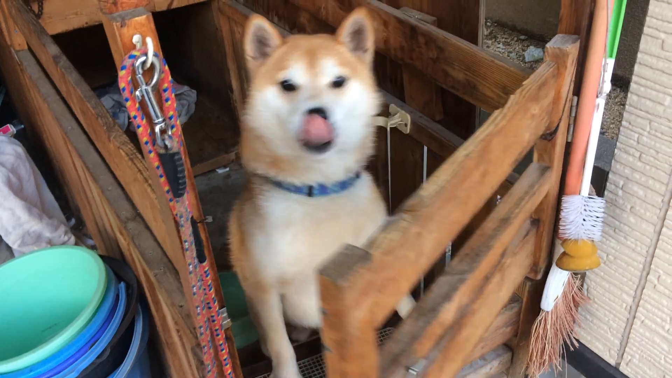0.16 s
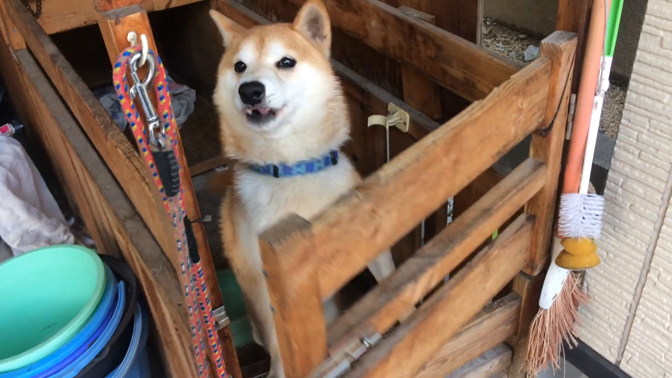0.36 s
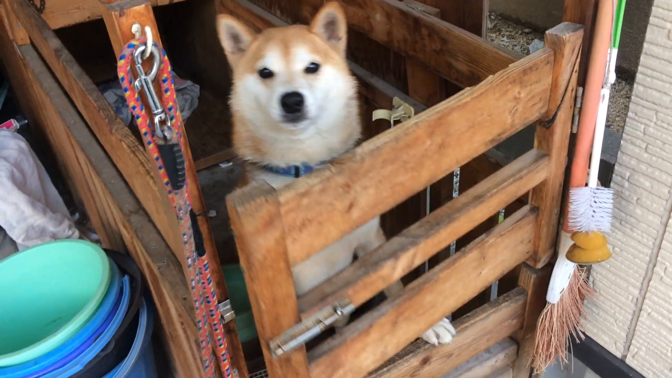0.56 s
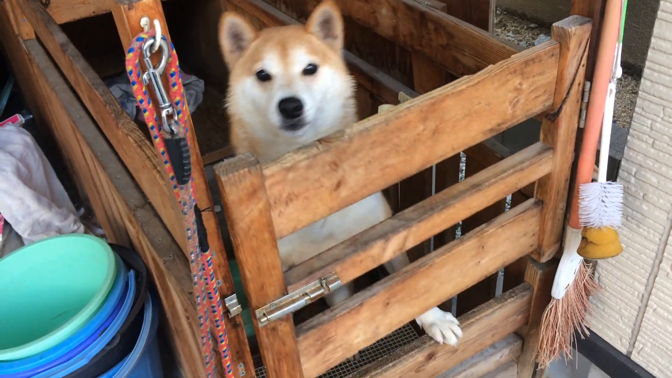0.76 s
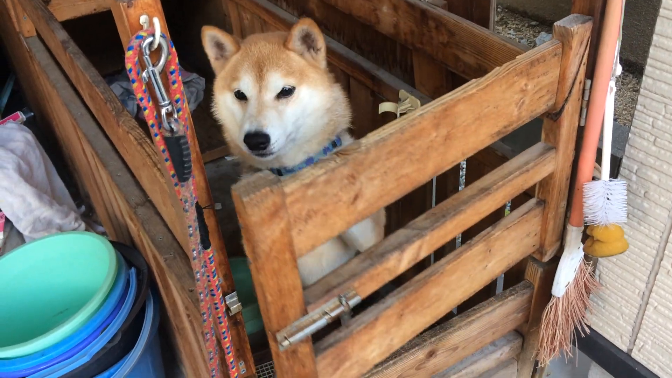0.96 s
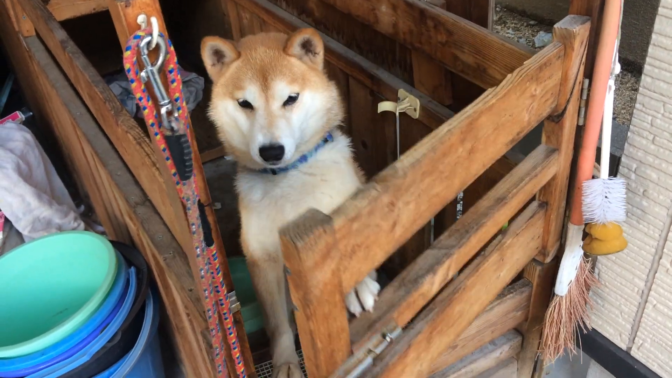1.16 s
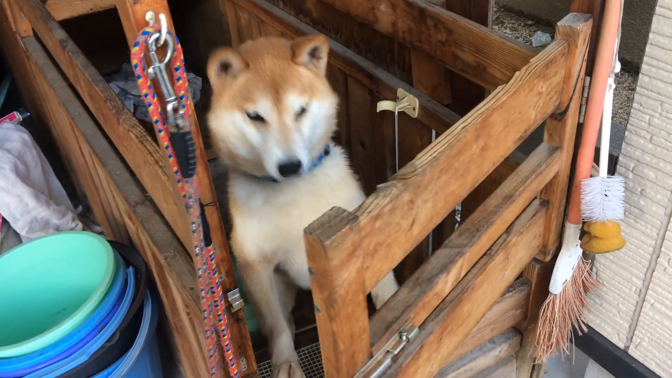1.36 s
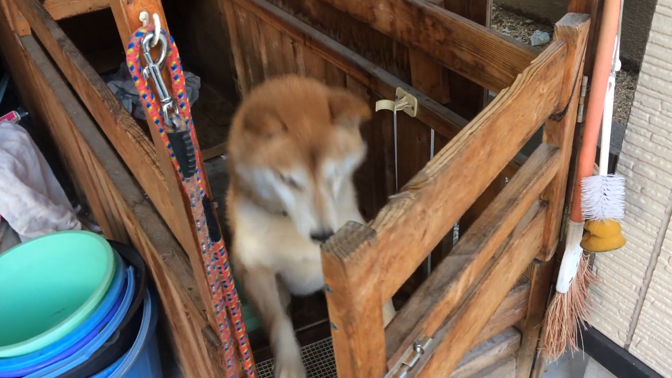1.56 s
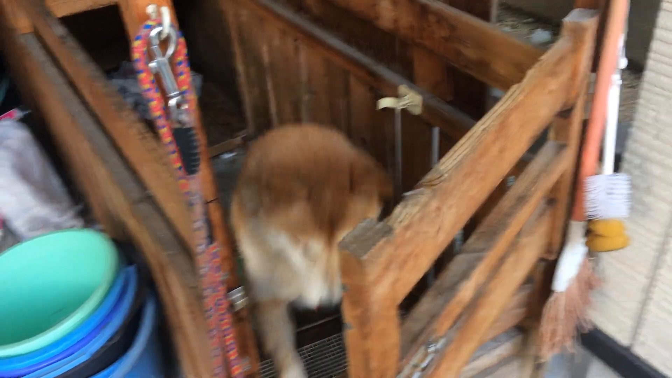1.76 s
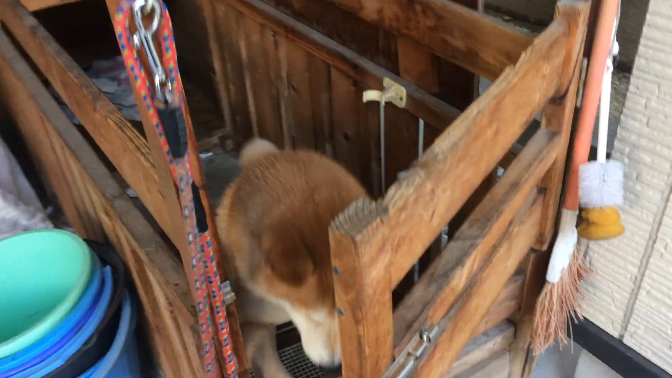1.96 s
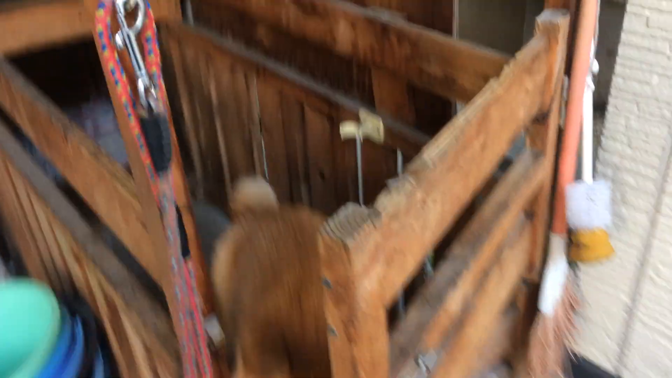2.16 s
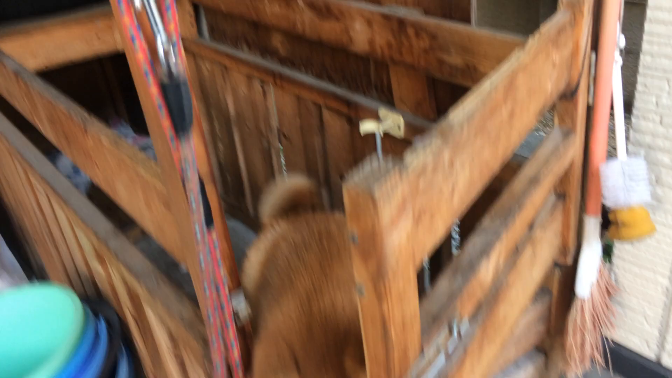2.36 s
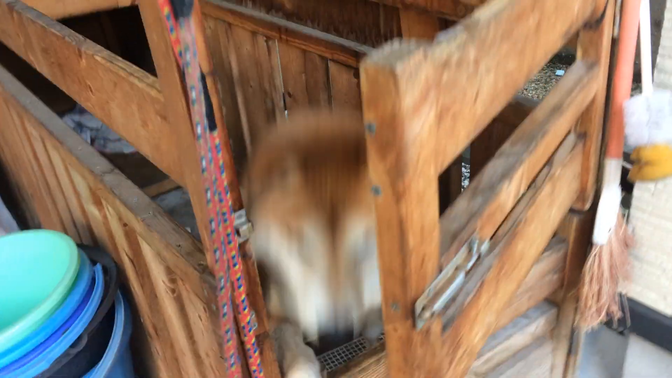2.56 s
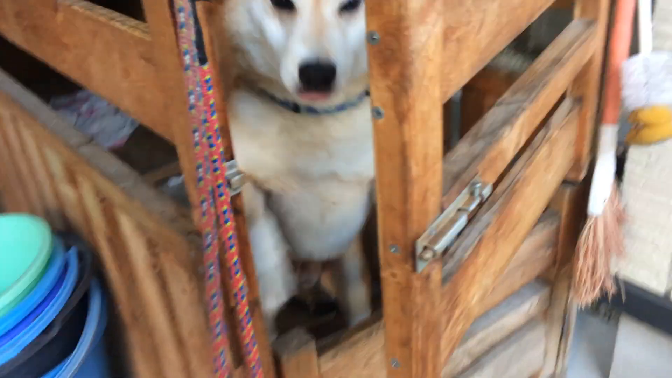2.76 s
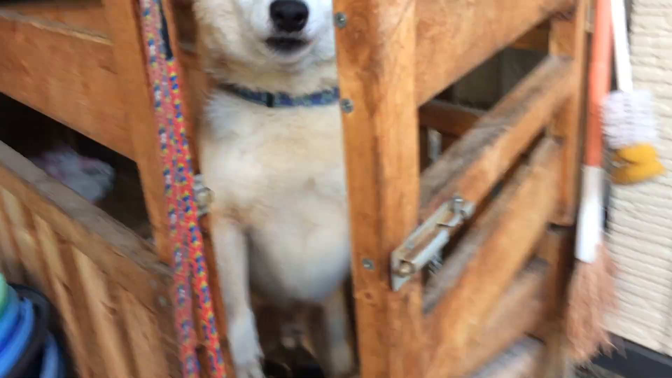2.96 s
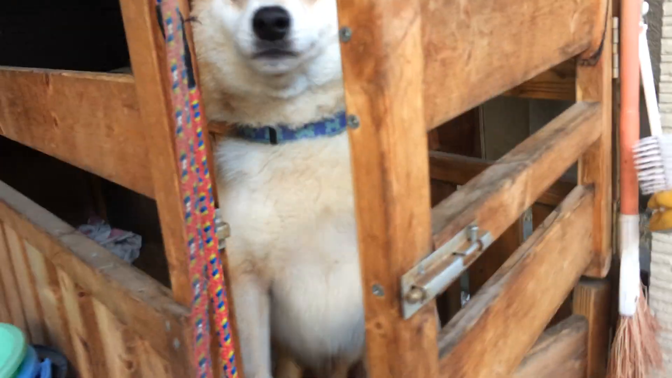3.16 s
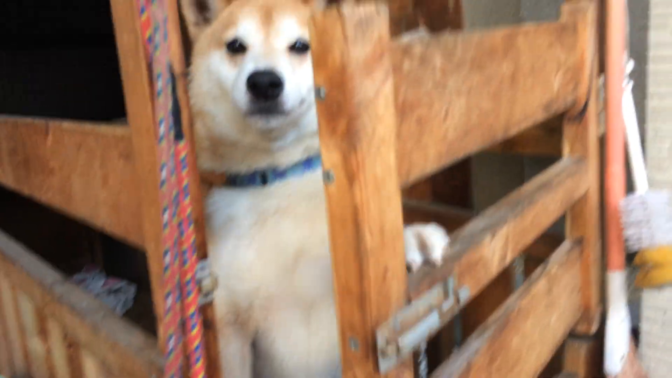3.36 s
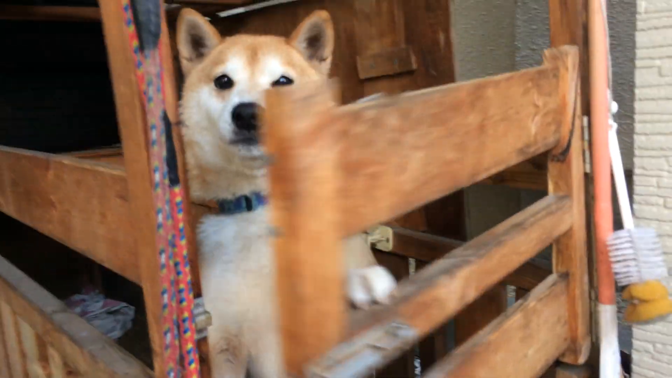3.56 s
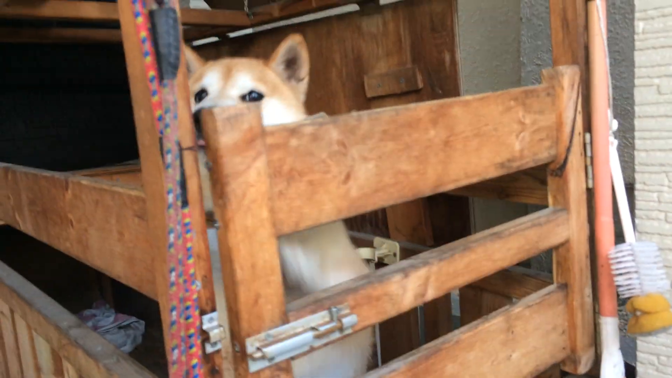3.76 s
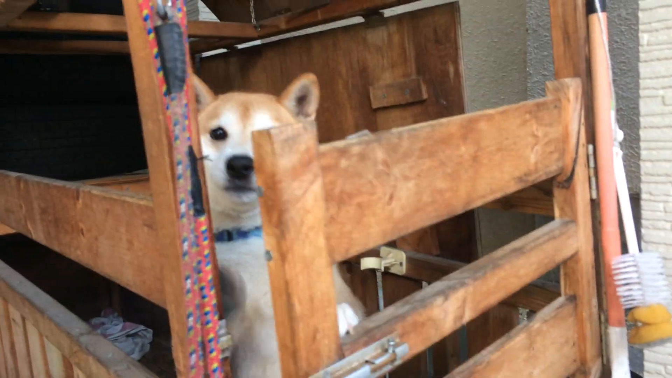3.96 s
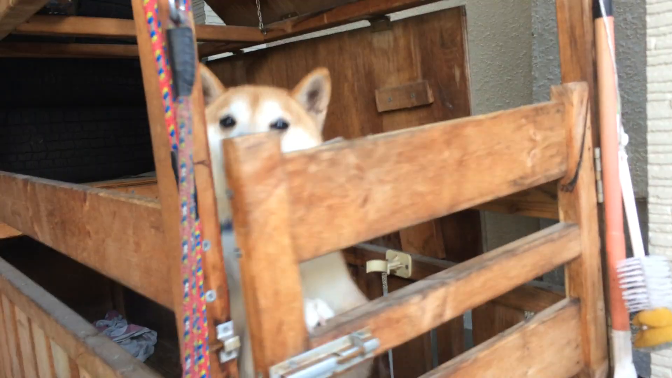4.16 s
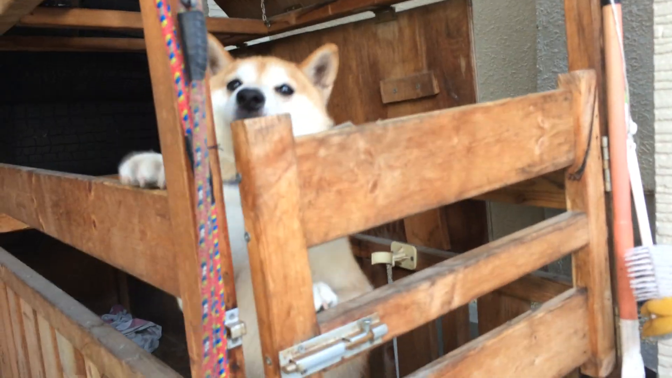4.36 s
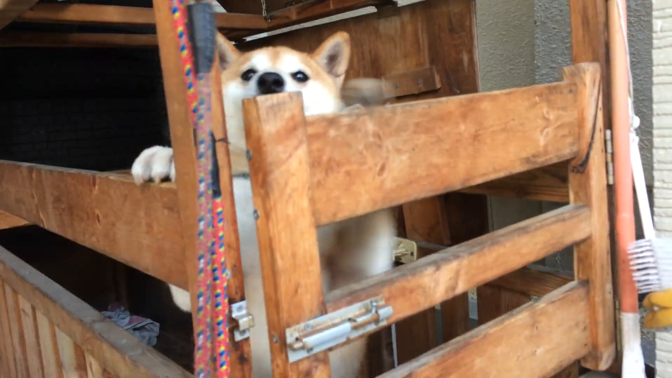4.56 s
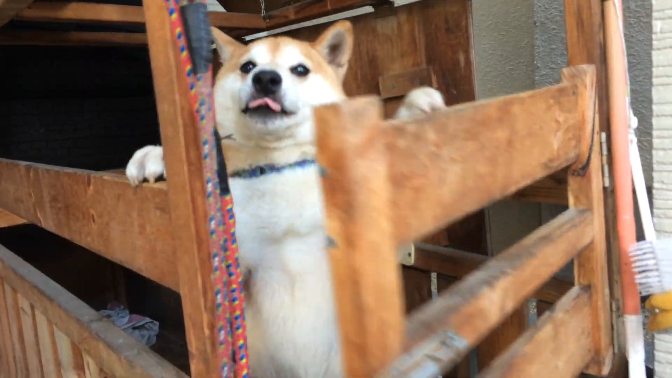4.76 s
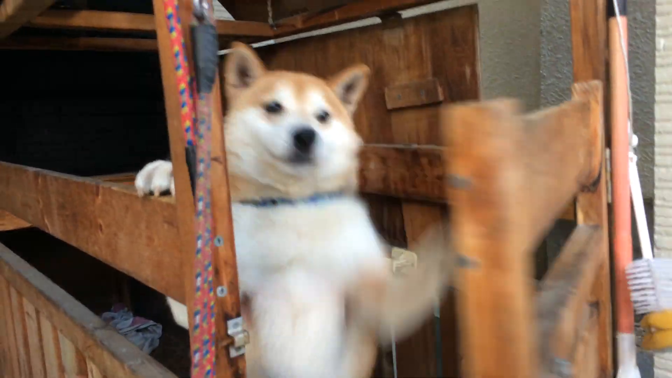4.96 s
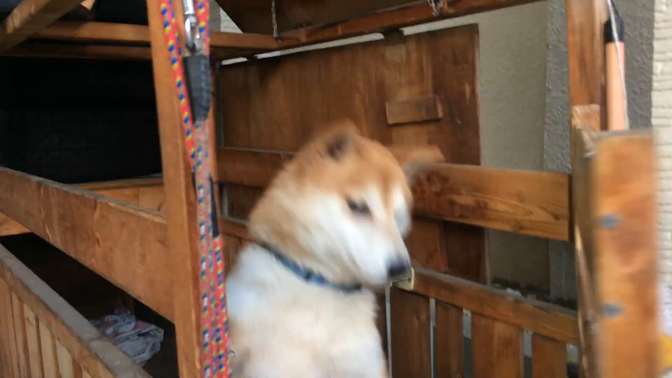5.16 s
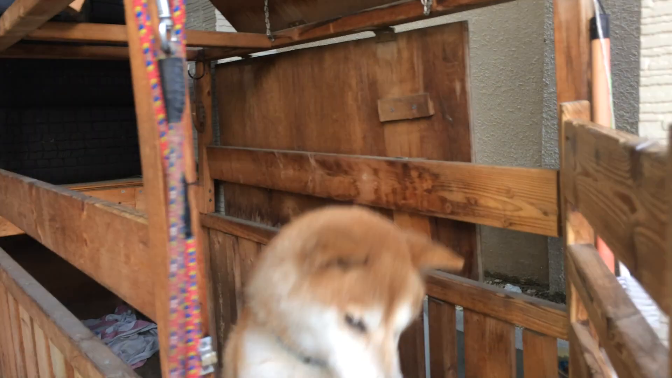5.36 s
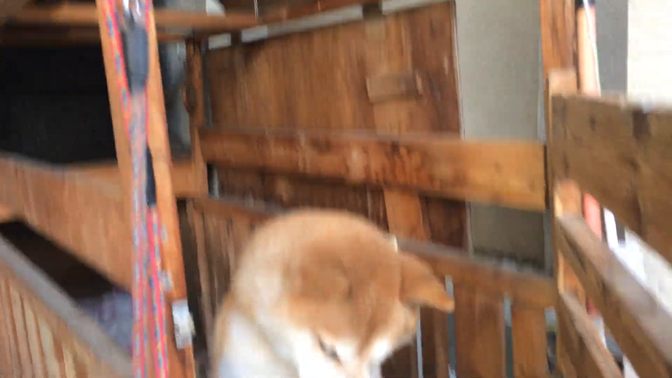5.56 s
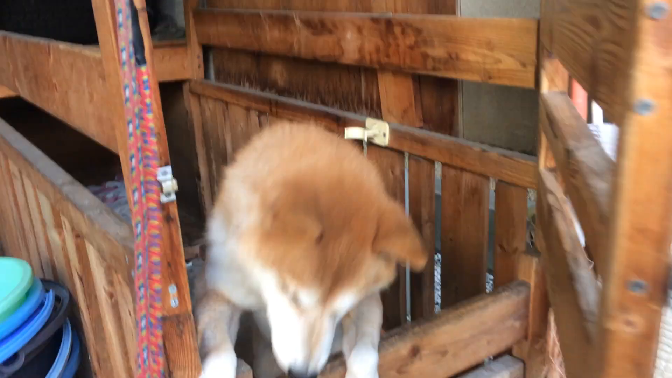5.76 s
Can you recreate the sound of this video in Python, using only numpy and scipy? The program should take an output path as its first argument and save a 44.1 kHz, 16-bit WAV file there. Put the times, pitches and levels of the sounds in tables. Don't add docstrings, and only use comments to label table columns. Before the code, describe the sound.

Claws rap, snap and rasp on the wooden slats of a kennel gate, uneven and very near the microphone. The early part is sparse and light; the knocks grow heavier, and the gate thuds low and rattles hard while its metal bolt chatters brightly. Short echoes return from planks and wall. The activity then fades into brushing scratches and a few taps above quiet open air.

```python
import sys
import numpy as np
from scipy import signal
from scipy.fft import rfft, irfft
from scipy.io import wavfile
from scipy.ndimage import uniform_filter1d

SR = 44100
rng = np.random.default_rng(int(sys.argv[2]) if len(sys.argv) > 2 else 0)


def how_loud(loudness_db):
    steps = np.asarray(loudness_db, float) / 20
    return 10 ** steps


def unload_audio(sound):
    columns = np.transpose(np.atleast_2d(sound))
    steps = np.round(np.clip(columns, -1, 1) * 32767)
    wavfile.write(sys.argv[1], SR, steps.astype(np.int16))


N = 256197


def evened(x):
    return x / np.sqrt(np.mean(x ** 2) + 1e-20)


def peaked(x):
    return x / (abs(x).max() + 1e-12)


def read(points, hz):
    f, value = np.transpose(points)
    return np.interp(np.log(hz + 1), np.log(f + 1), value)


def add(mix, s, sound):
    part = mix[round(s * SR):][:len(sound)]
    part += sound[:len(part)]


def coloured(x, points):
    gain = how_loud(read(points, np.fft.rfftfreq(len(x), 1 / SR)))
    return evened(irfft(rfft(x) * gain, len(x)))


def ring(hz, db, t60, t, sign=1):
    hz, db, t60, sign = (np.reshape(v, (-1, 1)) for v in (hz, db, t60, sign))
    decay = how_loud(db - 60 * t / np.clip(t60, .004, .2))
    return (sign * decay * np.sin(2 * np.pi * hz * t)).sum(0)


def contacts(chance, t, contact_s, rise_s):
    ticks = chance * abs(chance) ** 0.36
    swell = (1 - np.exp(-1.6 * t / max(rise_s, .0001))) ** 2
    return ticks * swell * np.exp(-(t / max(contact_s, .0005)) ** 1.304)


# [f/Hz, t60/s]
WOOD_DAMPING = [(300, 0.035), (800, 0.045), (1500, 0.03), (3000, 0.026), (7000, 0.024)]


def timber(points, hz, t, favour_db=0):
    shift, sign, weight = rng.standard_normal((3, len(hz)))
    hz = hz * (1 + .02 * shift)
    level_db = read(points, hz) + 2.0 * weight + favour_db
    return peaked(ring(hz, level_db, read(WOOD_DAMPING, hz), t, np.sign(sign)))


# [f/Hz, level/dB per Hz]
AIR_COLOUR = [(21, -68), (33, -3), (44, 6), (65, 4), (109, 3), (202, -3), (510, -12.5), (946, -12),
              (2330, -25), (2940, -35), (12800, -41), (15300, -40), (16500, -68)]


def air():
    frames, hz = N // 256 + 5, np.fft.rfftfreq(1024, 1 / SR)
    real, imag, patches = rng.standard_normal((frames, 513, 3)).T
    patches = evened(uniform_filter1d(uniform_filter1d(patches, 8, 0), 14, 1))
    swell = evened(uniform_filter1d(rng.standard_normal(frames), size=30))
    bass = (hz < 400)[:, None]
    z = (real + 1j * imag) * how_loud(2.0 * patches + 0.5 * swell * bass)
    noise = signal.istft(z, nperseg=1024, noverlap=768)[1][:N]
    return how_loud(-48.5) * coloured(noise, AIR_COLOUR)


# [f/Hz, t60/s]
KENNEL_DECAY = [(200, 0.45), (1000, 0.22), (4000, 0.14), (12000, 0.14)]


def kennel(x):
    at = np.arange(150, SR // 2 - 20, 20)
    echoes, shape = np.zeros((3, SR // 2)), (3, len(at))
    np.put_along_axis(echoes, at + rng.integers(0, 20, shape), rng.choice([-1., 1.], shape), 1)
    hz, t, z = signal.stft(echoes, SR, nperseg=256)
    decay = how_loud(-60 * t / read(KENNEL_DECAY, hz)[:, None])
    tail = signal.istft(z * decay, SR, nperseg=256)[1]
    turn_hz, phase = 4.3, np.arange(3)[:, None] / 3
    turn = np.cos(2 * np.pi * (turn_hz * np.arange(N) / SR + phase)) * np.sqrt(2 / 3)
    return signal.fftconvolve(x * turn, tail / np.linalg.norm(tail[0]), axes=1)[:, :N].sum(0)


# [t/s, peak level/dB, f/Hz]
FRAME_THUDS = [(1.398, -42.5, 287), (1.629, -34, 95.3), (2.197, -44, 94.5), (2.604, -37, 89),
               (2.799, -38.5, 115), (2.91, -36.5, 101), (3.256, -38, 107), (3.492, -35, 94),
               (3.623, -40, 105), (3.799, -27.5, 144), (3.841, -32.5, 105), (4.277, -27, 198),
               (4.289, -32, 86), (4.399, -40.5, 122), (4.721, -36, 71.6), (4.867, -38, 119),
               (4.887, -31, 104.7), (4.975, -36, 194), (5.493, -46, 97)]


def thuds():
    t, out, t60 = np.arange(12000) / SR, np.zeros(N), 0.18
    for s, db, hz in FRAME_THUDS:
        overtone = 0.22 * np.sin(2 * np.pi * 1.6 * hz * t) * how_loud(-40 * t / t60)
        swing = np.sin(2 * np.pi * hz * t) + overtone
        add(out, s, how_loud(db) * peaked(swing * how_loud(-60 * t / t60) * (1 - np.exp(-t / 0.0022))))
    return out


def hinge():
    start_s, length_s, squeak_hz, squeak_db = 5.578, 0.057, 3340, -62.5
    t, out = np.arange(0, length_s, 1 / SR), np.zeros(N)
    waver = evened(uniform_filter1d(rng.standard_normal(SR // 10), size=300))[:len(t)]
    tone = np.sin(2 * np.pi * np.cumsum(squeak_hz * (1 + .006 * waver)) / SR)
    add(out, start_s, how_loud(squeak_db + 3.8 * waver) * tone * signal.windows.tukey(len(t), .6))
    return out


# [t/s, peak level/dB, strongest f/Hz]
BOLT_JUMPS = [(0.711, -35, 10300), (2.573, -22.5, 10300), (3.194, -13, 10300), (3.794, -4, 9250),
              (3.8114, -14, 14500), (3.841, 1.5, 12700), (3.915, -15, 9000), (3.993, -8.5, 10100),
              (4.2624, -6.5, 10700), (4.31, -16, 10900), (4.4106, -18, 12100), (4.7232, 0.5, 13400),
              (4.735, -8, 8900), (4.875, -35, 8800), (5.043, -16, 13000)]
ROD_HZ = [7000, 8805, 9254, 10300, 10960, 12250, 14000, 15330]
# [level/dB, t60/s]
ROD_TONES = [(-9, 0.064), (-2, 0.029), (-6, 0.033), (1.5, 0.054), (-0.5, 0.063), (-2.5, 0.039), (-2, 0.026),
             (2, 0.036)]


def bolt():
    t, out = np.arange(4000) / SR, np.zeros(N)
    mode_db, t60 = np.transpose(ROD_TONES)
    for s, db, hz in BOLT_JUMPS:
        near_db = 9 * np.exp(-(np.log(np.divide(ROD_HZ, hz)) / .1) ** 2)
        rod = ring(ROD_HZ, mode_db + near_db + 0.8 * rng.standard_normal(len(t60)), t60, t)
        chatter = contacts(rng.standard_normal(len(t)), t, 0.0014, 0.00042)
        add(out, s, how_loud(db - 16.5) * peaked(signal.oaconvolve(chatter, rod)[:len(t)]))
    return out


# [t/s, peak level/dB, f/Hz, ring t60/s]
HOLLOW_KNOCKS = [(0.228, -15, 516, 0.036), (0.477, -31.5, 460, 0.085), (0.862, -38.5, 877, 0.061),
                 (1.372, -38, 598, 0.087), (1.553, -34.5, 647, 0.094), (2.587, -18, 558, 0.062),
                 (2.595, -37, 526, 0.045), (2.89, -36, 910, 0.025), (3.253, -15.5, 501, 0.047),
                 (3.787, -14.5, 644, 0.019), (3.811, -18.5, 870, 0.021), (3.839, -21.5, 960, 0.019),
                 (4.255, -9, 750, 0.024), (4.273, -19, 460, 0.052), (4.367, -28.5, 906, 0.044),
                 (4.724, -27, 710, 0.12), (4.863, -29, 850, 0.023), (4.886, -27.5, 920, 0.016),
                 (5.009, -34, 623, 0.081), (5.664, -51, 670, 0.041)]
# [f/Hz, level/dB]
BOARD_MODES = [(120, -23), (200, -4), (554, -6.5), (833, -5.5), (1340, -6.5), (1600, 2), (2080, -30),
               (3520, -120)]


def knocks():
    t, out = np.arange(5000) / SR, np.zeros(N)
    board_hz = np.geomspace(200, 1500, num=30)
    for s, db, hz, t60 in HOLLOW_KNOCKS:
        bunch = peaked(ring(hz * np.array([.88, 1, 1.12]), [-6, 0, -5], t60, t))
        crowd = timber(BOARD_MODES, board_hz, t, 10 * np.exp(-(np.log(board_hz / hz) / .5) ** 2))
        rebounds = contacts(rng.standard_normal(len(t)) ** 3, t, .011, 0.0026)
        rattle = peaked(signal.oaconvolve(rebounds, crowd + bunch)[:len(t)])
        blow = (bunch + how_loud(-4.5) * crowd) * (1 - np.exp(-t / 0.0027))
        add(out, s, how_loud(db - 5) * peaked(blow + how_loud(-13) * rattle))
    return out


# [t/s, rasp level/dB, fur and grit hiss level/dB, time to lose 20 dB/s]
PAW_SLIDES = [(.485, -63, -60, 0.8), (.85, -43, -56, -0.33), (0.917, -46, -38, -1.35), (1.15, -51, -61, 0),
              (1.27, -59.5, -68.5, 0.35), (1.38, -60, -56, 0.27), (1.63, -52, -43, 0.3),
              (1.815, -52.5, -53, 0.35), (2.15, -67.5, -72, 4.5), (2.6, -50, -39, 0.25),
              (2.775, -47.5, -40.5, 0.58), (3.04, -60, -48.5, 0.2), (3.22, -66, -51, 0.8),
              (3.485, -57.5, -51, 0.45), (4.01, -53.5, -54, 0.56), (4.27, -37.5, -42, 0.2246),
              (4.47, -61, -55, 1.1), (4.76, -54, -49, 0.26), (4.84, -57, -55, 0.7),
              (5.09, -52.5, -46, 0.14), (5.36, -52, -65, 0.08)]


def slides(power):
    t = np.arange(N) / SR
    for s, db, hiss_db, fade_s in PAW_SLIDES:
        span_s = 4 * fade_s
        if fade_s < 0:
            fade_s, span_s = .01, .4
        at = slice(round(s * SR), round((s + span_s) * SR))
        loss_db = 20 * ((t[at] - s).clip(0) / max(fade_s, .01)) ** 0.73
        power[:, at] += how_loud([db - loss_db, hiss_db - 2.52 * loss_db]) ** 2


# [strongest at t/s, length/s, rasp level/dB, hiss level/dB]
CLAW_STROKES = [(0.154, 0.074, -55, -55), (0.307, 0.26, -51, -46), (0.939, .09, -56.5, -65),
                (1.352, 0.028, -51, -66), (1.526, .03, -61, -62.5), (1.613, 0.022, -51, -50),
                (1.794, 0.081, -53, -58), (2.05, 0.03, -68, -58), (2.106, .025, -63, -60),
                (2.214, 0.02, -54, -65), (2.309, 0.036, -63, -66), (2.442, .07, -55, -56),
                (2.807, 0.13, -49.5, -54), (2.924, 0.16, -42.5, -42), (3.813, 0.057, -38, -43),
                (3.91, 0.16, -46.5, -51), (4.081, 0.056, -48.5, -56), (4.398, 0.19, -45, -47),
                (4.723, 0.047, -42.5, -50), (5.007, 0.051, -73, -63), (5.063, 0.069, -37.5, -43),
                (5.304, 0.11, -39, -55.5), (5.487, 0.11, -60.5, -65), (5.627, 0.081, -63.5, -65),
                (5.76, 0.34, -65, -67)]


def strokes(power):
    t = np.arange(N) / SR
    for s, length, db, hiss_db in CLAW_STROKES:
        at = slice(max(round((s - length) * SR), 0), round((s + length) * SR))
        arch_db = -17 * abs(2 * (t[at] - s) / length) ** 1.94
        power[:, at] += how_loud([db + arch_db, hiss_db + arch_db]) ** 2


# [f/Hz, level/dB per Hz]
RASP_COLOUR = [(400, -49), (800, -19), (1300, -12.5), (2200, 1.5), (3200, -2), (4300, -2), (6000, -5.5),
               (9000, -16), (15000, -68)]
# [f/Hz, level/dB per Hz]
HISS_COLOUR = [(2500, -2), (4500, -5.5), (6500, -2), (10000, -8), (13500, -7.5), (15500, -14), (16500, -31)]
# [f/Hz, level/dB, t60/s]
SCRAPED_SLAT = [(1401, -0.5, 0.045), (1900, -7, 0.039), (2330, 3.5, 0.016), (3180, 0.5, 0.029),
                (3720, -1, 0.031), (4110, -6.5, 0.023)]


def drags():
    power = np.zeros((2, N))
    slides(power)
    strokes(power)
    pressure = np.sqrt(abs(uniform_filter1d(power, size=150, axis=1)))
    grains = rng.standard_normal((2, N)) * how_loud(2.5 * np.minimum(rng.exponential(1, (2, N)), 4))
    clumps = how_loud(2.2 * evened(uniform_filter1d(rng.standard_normal(N), size=200)))
    rough, fine = grains * clumps
    slat = ring(*np.transpose(SCRAPED_SLAT), np.arange(1500) / SR)
    ringing = evened(signal.oaconvolve(rough, slat)[:N])
    rasp = coloured(rough, RASP_COLOUR) + how_loud(-6.0) * ringing
    return (pressure * [rasp, coloured(fine, HISS_COLOUR)]).sum(0)


# [t/s, peak level/dB]
CLAW_SNAPS = [(0.768, -22), (0.8629, -33), (1.3674, -34), (1.62, 7.5), (1.806, -32), (2.022, -23),
              (2.7643, 11), (3.208, -11), (3.8114, -18), (4.073, -26), (4.9604, -15), (5.024, 5),
              (5.047, 1), (5.255, -25), (5.4564, -47), (5.687, -21)]


def snaps():
    t, out = np.arange(300) / SR, np.zeros(N)
    bright = signal.butter(2, [2800, 13000], "band", fs=SR)
    for s, db in CLAW_SNAPS:
        tick = signal.lfilter(*bright, rng.standard_normal(len(t)) * np.exp(-t / .0006))
        add(out, s, how_loud(db - 24.5) * peaked(tick))
    return out


# [f/Hz, level/dB, t60/s]
GATE_MODES = [(941, -4, 0.03), (1144, -7, 0.028), (1397.4, -2, 0.027), (1578, -2, 0.026), (1746, 0, 0.031),
              (1932, -1.5, 0.021), (2265, -1.5, 0.029), (2560, -2.5, 0.017), (2973, -3, 0.034),
              (3386, -3.5, 0.024), (3781, -3.5, 0.023), (4060, -3.5, 0.021), (4795, -6.5, 0.039),
              (5810, -6.5, 0.031)]
# [f/Hz, level/dB]
SLAT_MODES = [(530, -28), (900, -7), (1680, -2), (2790, -3), (3810, -8.5), (4330, -6.5), (6540, -14.5),
              (7000, -1.5), (9100, -20), (15400, -120)]


def tap(db, crack_db, contact_s, rise_s, hz):
    t, short = np.arange(3000) / SR, np.arange(1500) / SR
    drive = contacts(rng.standard_normal(len(t)), t, contact_s, rise_s)
    gate_hz, gate_db, t60 = np.transpose(GATE_MODES)
    spot, shift = rng.standard_normal((2, len(gate_hz)))
    gate_hz = gate_hz * (1 + .012 * shift)
    luck = abs(np.exp(-2j * np.pi * np.outer(gate_hz, short)) @ drive[:len(short)])
    gate_db = gate_db - 16 * np.log10(luck / luck.mean() + .1)
    near_db = 13 * np.exp(-(np.log(gate_hz / hz) / .2) ** 2)
    sign = (-1) ** np.arange(len(gate_hz))
    main = peaked(ring(gate_hz, gate_db + near_db + 1.22 * spot, t60, short, sign))

    slat_hz = np.geomspace(900, 7000, num=60)
    stiff_db = -4 * (slat_hz < .8 * min(hz, 1410))
    crowd = timber(SLAT_MODES, slat_hz, short, stiff_db)
    crowd_db = -7 + .45 * (db + 24)
    body = signal.oaconvolve(drive, main + how_loud(crowd_db) * crowd)[:len(t)]
    thin = signal.butter(2, 0.61 * min(hz, 1770), "high", fs=SR)
    sound = peaked(signal.lfilter(*thin, body))

    grit = rng.standard_normal(len(t)) * uniform_filter1d(abs(drive), size=60, origin=29)
    sharp = signal.butter(1, [4500, 12000], "band", fs=SR)
    crack = peaked(signal.lfilter(*sharp, signal.lfilter(*sharp, grit)))
    fade = signal.windows.tukey(2 * len(t), .3)[len(t):]
    return how_loud(db) * (sound + how_loud(crack_db + 2) * crack) * fade


# [t/s, peak level/dB, dry crack level/dB, contact/ms, rise/ms]
ON_FRAME = [(0.2248, -25, -12, 8.4, 1.3), (1.56, -29, -30, 11, 2.8), (2.5845, -24.5, -18, 4.8, 1.3),
            (2.8774, -34, -6, 33, 6), (3.0105, -55, 6, 10, 4), (3.2494, -24.5, -6.5, 3.4, 1),
            (3.4801, -23.5, -4.5, 7.5, 2.2), (3.7878, -13, -25, 3, .3), (4.2546, -11, -31, 4.4, 0.27),
            (4.887, -32.5, -3, 3.2, 1.5), (5.011, -35, -14, 2.8, 0.86), (3.8102, -17, -6, 4.4, 1.7),
            (4.2705, -21, -9, 5.8, 2.5), (4.7135, -19.5, -17, 5.1, 0.49), (3.904, -20.5, -25, 3.5, 0.49),
            (4.8637, -32, -35, 9.8, 1.2)]
ON_RAIL = [(1.136, -24, -16.5, 9.2, 3.8), (1.169, -31, -11.5, 6.9, 1.7), (1.257, -25.5, -8.5, 6.9, 1.6),
           (1.3568, -22, -19, 6.8, 6.3), (1.938, -37, -19, 14, 2.1), (2.5564, -41, -26, 17, 3.9),
           (3.025, -28.5, -7, 5.7, 0.38), (3.181, -31, -20, 3.9, 2.2), (3.2023, -27, -8, 3.8, 1.5),
           (3.465, -20, -2.5, 8.2, 2.8), (3.55, -24, -11.5, 9.1, 1), (3.7754, -21.5, -27, 6.2, 3.7),
           (3.8011, -18.5, -7, 6, 1.2), (3.8416, -15.5, -7, 7, .3), (3.929, -25, -17, 5.3, 2),
           (3.9929, -16, -6, 5.1, 0.84), (4.3095, -16.5, -6.5, 5, 0.52), (4.3884, -24, -5, 4.1, 1.1),
           (4.4101, -16.5, -6, 5.5, 0.15), (4.4353, -21, -37, 7, 0.68), (4.4728, -26.5, -15, 3.7, 1.2),
           (4.514, -26, -20, 5, 1), (4.6923, -27, -30, 12, 0.48), (4.731, -17.5, -7, 5.5, 1.6),
           (4.829, -20.5, -10.5, 3.8, 1.3), (4.9408, -33, -20, 9, 1.1), (4.554, -27, -22, 3.2, 1.2)]
ON_SLAT = [(0.148, -31, -14, 5.2, 2.6), (0.712, -39.5, -25, 6.4, 0.77), (0.8402, -28, -19, 9.7, 1),
           (0.872, -31, -22, 7.6, 1.9), (1.350, -36, -12, 11, 6), (1.3676, -17.5, -16.5, 1.8, 0.65),
           (1.419, -36.5, -7, 4.8, 1.7), (1.6614, -32, -6, 2.7, 0.45), (1.902, -46.5, -6.5, 13, 3),
           (2.7465, -33.5, -3, 7.6, 1.7), (3.1325, -47.5, -2, 9.6, 2.3), (3.7888, -12.5, -11.5, 5.3, 0.55),
           (3.829, -23, -29, 2.5, 1), (3.97, -36.5, -11, 13, 1.8), (4.073, -42, -23, 5.9, 2),
           (4.241, -27, -10.5, 8, 0.33), (4.2573, -10, -35, 5.4, 1.5), (4.2937, -24.5, -9, 8, 2),
           (4.365, -20, -13, 4.7, 0.72), (4.4512, -20.5, -17, 3.9, 0.51), (4.543, -26, -25, 5.7, 5.5),
           (4.594, -38, -3, 4.1, 1), (5.717, -39.5, -18, 6, 1.1)]
ON_LATH = [(0.381, -36, -29, 6.3, 2.4), (0.4749, -30.5, -10, 3.3, 0.64), (0.661, -36, 3.5, 3.8, 1.4),
           (1.536, -30, -25, 9.5, .6), (1.5593, -21.5, -19, 8.3, 0.51), (2.593, -26, -3.5, 2.3, 1.7),
           (2.893, -38, -3, 14, 3.9), (3.9115, -23.5, -2, 4.4, 1), (5.036, -34, -20, 5.4, 1),
           (5.051, -24.5, -19, 5.1, 1.6), (5.071, -36, -20, 7.7, 3.9), (5.1015, -41, -18, 5.7, 2),
           (5.294, -34, -18, 7.4, 2.2), (5.31, -37, -23, 5.5, 1.8), (5.327, -42, -12, 8.6, 2.4),
           (5.641, -41.5, -8, 5.7, 1.5), (5.699, -41.5, -10.5, 5.5, 2)]
ON_EDGE = [(0.1243, -45.5, -11, 4.3, 1.5), (0.4933, -33, -15, 7.1, 3), (0.862, -25, -13, 2.5, 0.53),
           (1.544, -30.5, -19, 14, 1.5), (1.6172, -23.5, -1.5, 5.3, 0.45), (1.806, -26, -6.5, 3.6, 0.45),
           (2.143, -36, -12, 7.5, 3.2), (2.7623, -17, -4, 3.2, 0.89), (3.208, -23, 4, 4.6, 1),
           (3.9028, -17.5, -29, 3.4, 0.37), (4.085, -30.5, -3.5, 1.3, .2), (4.63, -42.5, -13, 3.4, 1.5),
           (4.7236, -22, -16, 13, 0.92), (5.023, -32.5, -20, 2.1, 0.83), (5.0429, -27.5, -20, 4.9, 1.2),
           (5.277, -26.5, -16, 8, 3), (5.2527, -24, -2.5, 4.2, 0.75), (5.7634, -25.5, -16, 6.2, 2.6)]


def taps():
    out = np.zeros(N)
    pieces = [(ON_FRAME, 1040), (ON_RAIL, 1410), (ON_SLAT, 1770), (ON_LATH, 2450), (ON_EDGE, 3750)]
    for rows, hz in pieces:
        for s, db, crack_db, contact_ms, rise_ms in rows:
            add(out, s, tap(db, crack_db, contact_ms / 1e3, rise_ms / 1e3, hz))
    return out


def scene():
    gate = hinge() + bolt() + knocks() + drags() + snaps() + taps()
    return (air() + how_loud(-9.5) * kennel(gate) + thuds() + gate)[None]


def roll_off(x):
    return signal.sosfilt(signal.butter(12, 16990, fs=SR, output="sos"), x)


def record(dry):
    low = signal.butter(3, 38, "high", fs=SR, output="sos")
    top = signal.butter(16, 15950, fs=SR, output="sos")
    opened = np.arange(N) > .0435 * SR
    heard = signal.sosfilt(np.vstack([low, top]), dry) * opened
    return roll_off(heard)


dry = scene()
out = record(dry)
unload_audio(out)
```